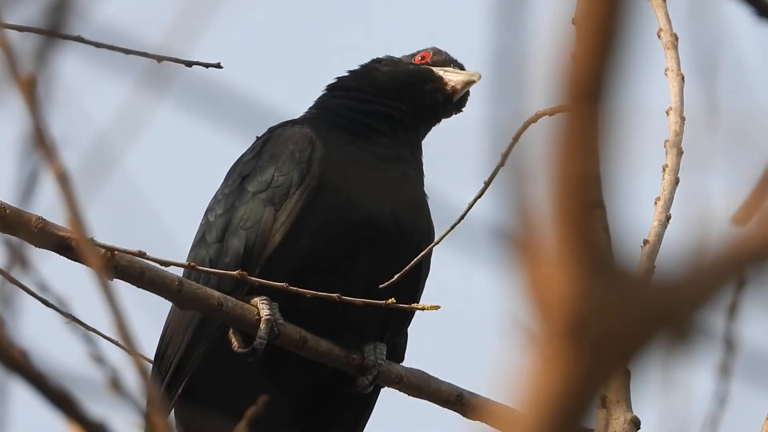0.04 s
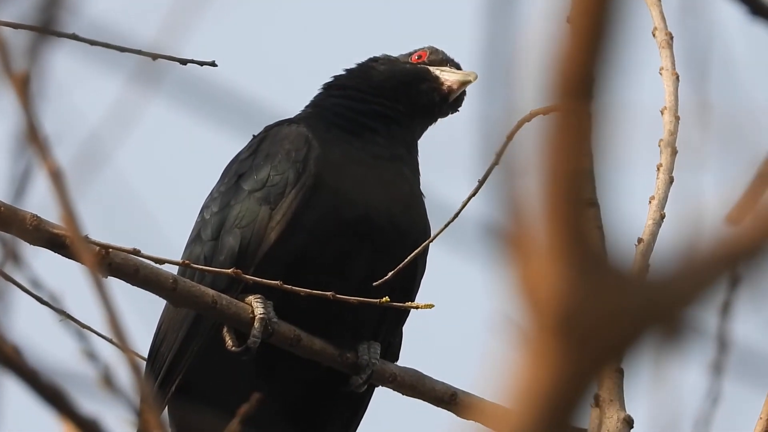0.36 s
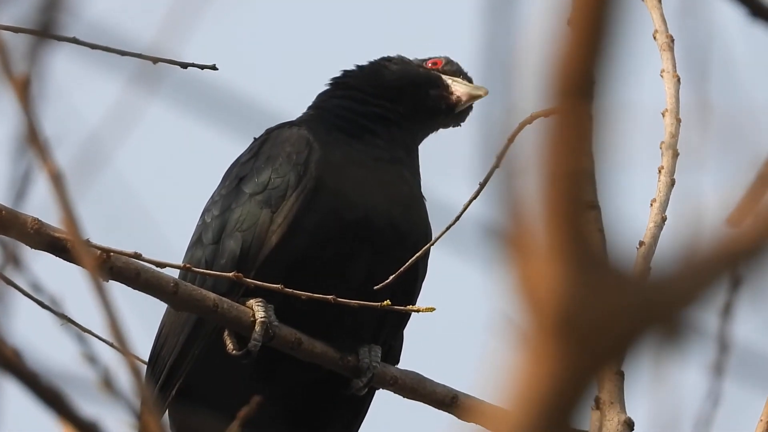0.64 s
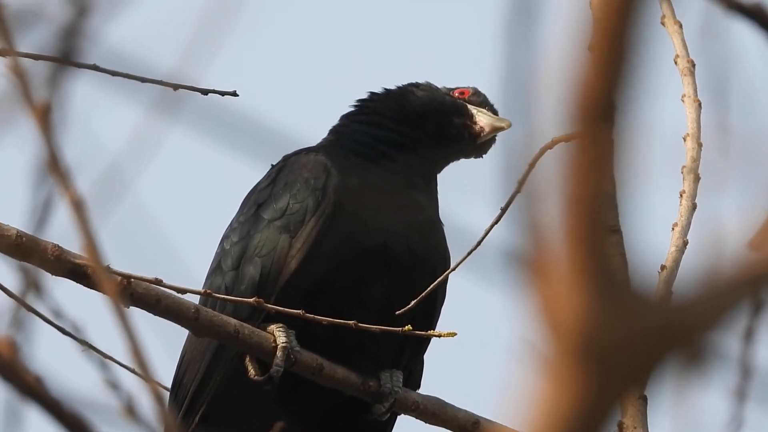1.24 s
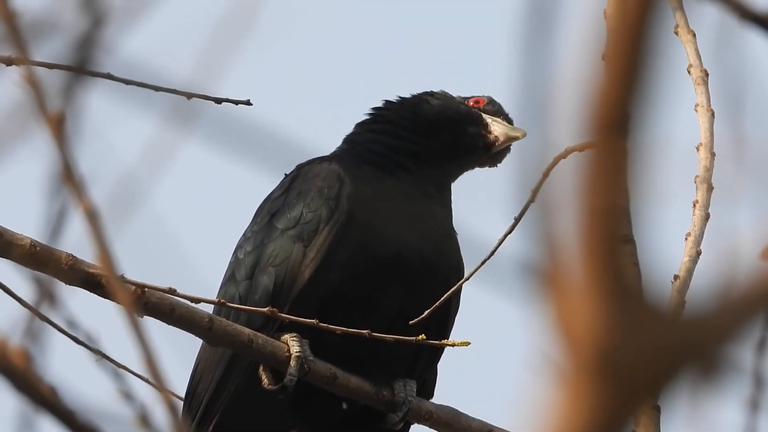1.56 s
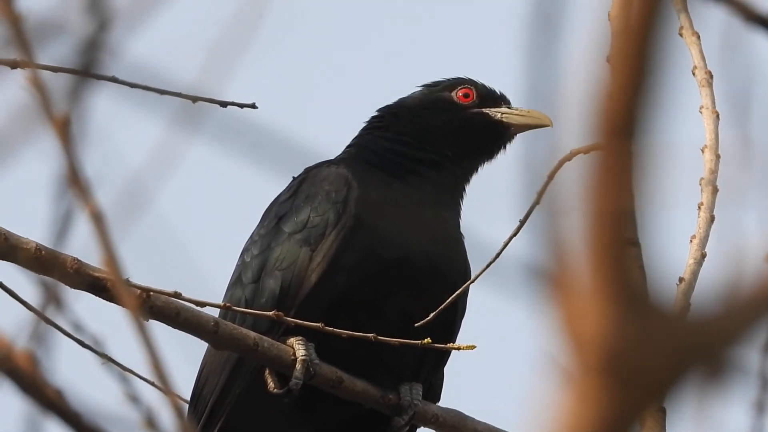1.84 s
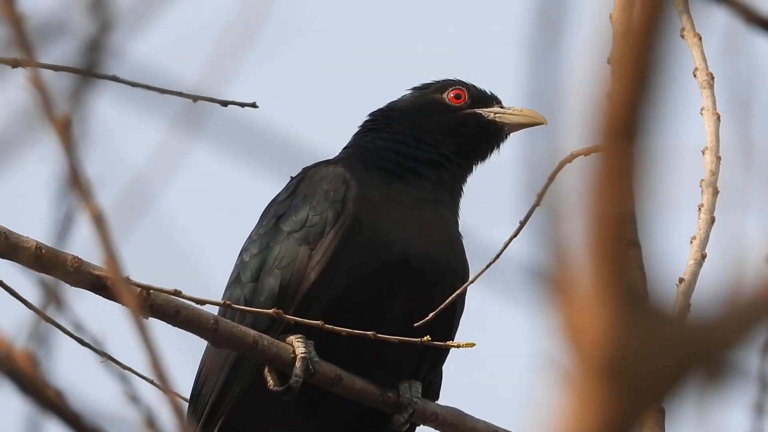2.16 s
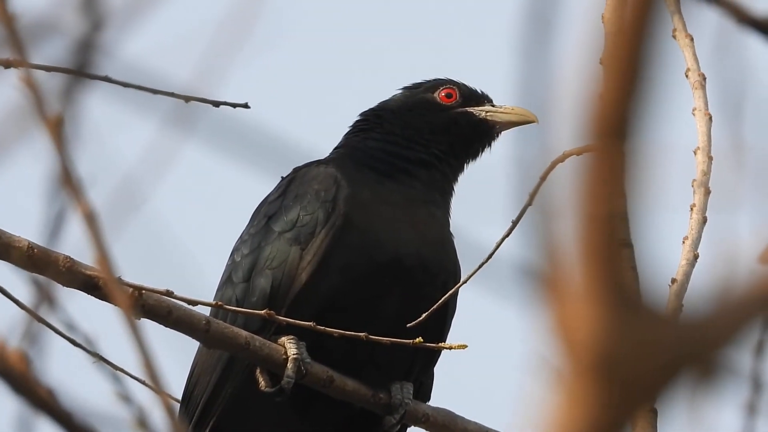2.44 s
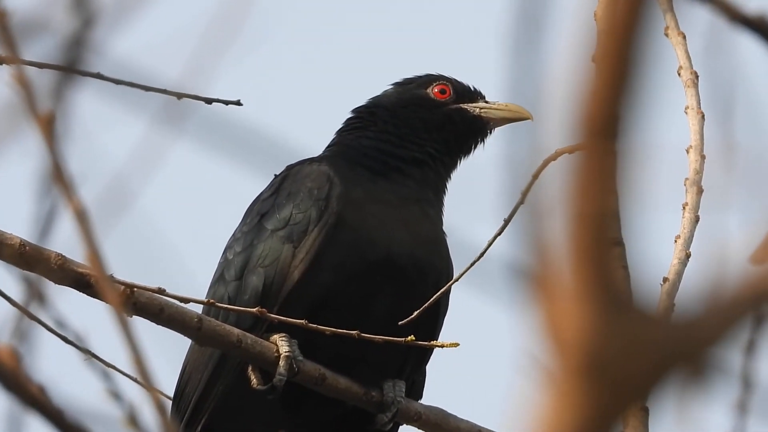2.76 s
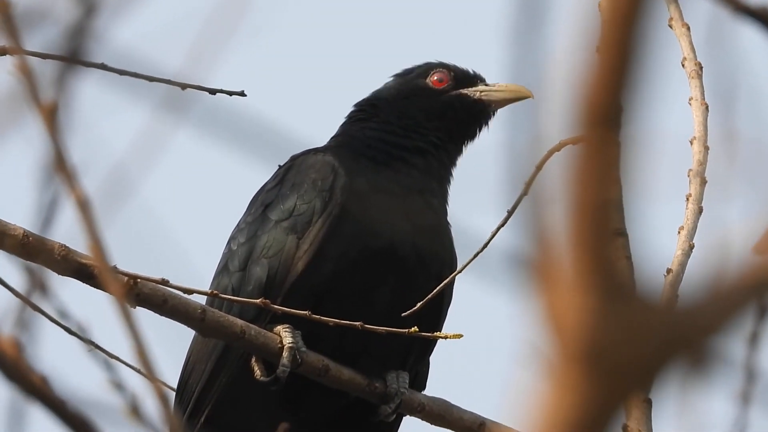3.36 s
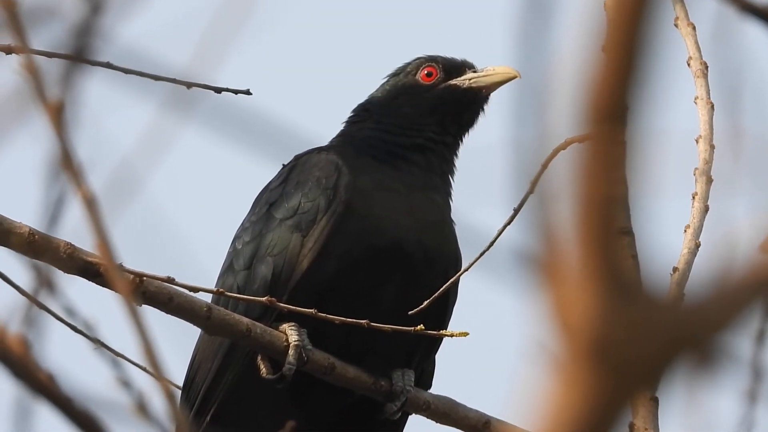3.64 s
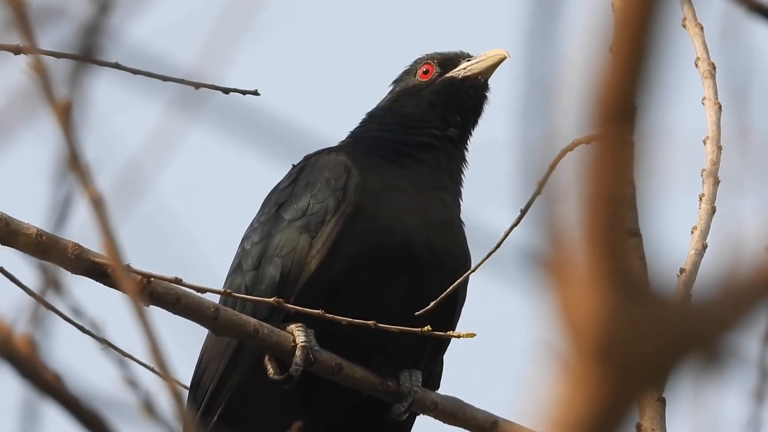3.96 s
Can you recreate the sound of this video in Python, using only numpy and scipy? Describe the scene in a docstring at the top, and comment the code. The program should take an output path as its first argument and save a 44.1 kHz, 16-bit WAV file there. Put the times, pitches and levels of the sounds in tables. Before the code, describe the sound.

A cuckoo-like bird hoots a low four-note phrase about every 0.65 seconds for the whole four seconds, with thin whistles and buzzy chirps in the surrounding trees. Around 1 second come three rising whistles and the start of hoarse, falling chatter. A few close, dry ticks follow from 1.4 seconds, and three grating squawks sound between 2.7 and 3.6 seconds. A distant wash and soft hiss lie underneath.

```python
"""Four seconds among trees, on a stereo microphone, over a distant wash and a soft hiss.
From the start a cuckoo-like bird hoots four near-pure notes every 0.65 s, with thin whistles
and buzzy chirps and hissy chips in the branches. Around 1 s come three rising whistles and the first
hoarse, falling chatter, then a few close ticks; from 2.7 s, three squawks of irregular throat pulses.
Trunks and branches scatter every call into a short tail."""
import sys
import numpy as np
from scipy import signal
from scipy.fft import rfft, irfft
from scipy.io import wavfile
from scipy.ndimage import uniform_filter1d

SR = 44100
rng = np.random.default_rng(int(sys.argv[2]) if len(sys.argv) > 2 else 0)


def log_audio(samples):
    """Write samples as a 16-bit WAV file to the path given in sys.argv[1]."""
    # one column per channel
    frames = np.atleast_2d(samples).T
    # limit to full scale, then quantise
    limited = np.clip(frames, -1, 1)
    pcm = np.round(limited * 32767).astype(np.int16)
    wavfile.write(sys.argv[1], SR, pcm)


N = 4 * SR


def amp(db):
    return 10 ** (np.asarray(db) / 20)


def unit(x):
    """Scales to rms 1."""
    return x / np.sqrt(np.mean(x ** 2) + 1e-20)


def phase(hz):
    return 2 * np.pi * np.cumsum(hz) / SR


def read(points, hz):
    """Reads a table on a log-frequency axis."""
    f, value = np.transpose(points)
    return np.interp(np.log(hz + 1), np.log(f + 1), value)


def add(mix, start_s, sound):
    """Mixes a sound in, dropping what falls outside the mix."""
    at = round(start_s * SR)
    sound = sound[max(-at, 0):]
    part = mix[max(at, 0):][:len(sound)]
    part += sound[:len(part)]


def note(length, edge_s):
    """Progress u, 0-1, through a note, and its envelope with soft ends."""
    u = np.linspace(0, 1, int(length * SR))
    to_end_s = np.minimum(u, 1 - u) * length
    return u, np.sin(np.pi / 2 * np.minimum(to_end_s / min(edge_s, length / 2), 1))


def coloured(x, gain):
    """Filters by a gain that is a function of frequency; rms 1."""
    return unit(irfft(rfft(x) * gain(np.fft.rfftfreq(len(x), 1 / SR)), len(x)))


def waver(u, rate_hz):
    """Smooth random motion as long as u, rms about 1."""
    noise = rng.standard_normal(len(u) + 4096)
    return coloured(noise, lambda f: np.exp(-.5 * (f / rate_hz) ** 2))[:len(u)]


def rasp(hz, breath, harmonics):
    """Throat pulses mixed with a puff of noise in each cycle."""
    cycle = phase(hz)
    pulses = unit(sum(np.cos(k * cycle) for k in range(1, harmonics + 1)))
    puffs = unit((1 + np.cos(cycle)) * rng.standard_normal(len(cycle)))
    return (1 - breath) * pulses + breath * puffs


def burst(length, edge_s, centre_hz, width_hz, top_hz=10340):
    """A short puff of noise in one broad resonance."""
    def resonance(f):
        peak = 1 / np.hypot(1, 2 * (f - centre_hz) / width_hz)
        return peak * f / (f + centre_hz) / (1 + (f / top_hz) ** 16)
    u, env = note(length, edge_s)
    return env * coloured(rng.standard_normal(len(u)), resonance)


BIRDS_LAG_S = .00005  # the smaller birds reach the right channel this much later
# Time the trees take to die away by 60 dB: f/Hz, decay/s
TREE_DECAY = [(200, 0.43), (800, 0.66), (3000, 1), (6000, 0.61), (10000, 0.6)]


def trees(x, wet_db, lag_s=0, width=1):
    """Direct sound at the microphone plus sparse scattering from trunks and branches."""
    echoes_per_s, first_echo_s = 2500, .0022
    taps = rng.standard_normal((2, SR)) * (rng.random((2, SR)) < echoes_per_s / SR)
    taps *= np.arange(SR) > first_echo_s * SR
    hz, t, spectrum = signal.stft(taps, SR, nperseg=256)
    decay = amp(-60 * t / read(TREE_DECAY, hz)[:, None])
    tail = signal.istft(spectrum * decay, SR, nperseg=256)[1]
    tail = tail.mean(0) + width * (tail - tail.mean(0))
    wet = signal.fftconvolve(x[None], tail / np.linalg.norm(tail[0]), axes=1)[:, :N]
    direct = np.array([x, np.roll(x, round(lag_s * SR))])
    return (direct + amp(wet_db) * wet) / np.hypot(1, amp(wet_db))


# Spectrum of the open air: f/Hz, relative level/dB
AIR_SPECTRUM = [(15, -59), (25, -47), (59, -31), (120, -19.5), (175, -3.5), (245, -8.5), (310, -1.5),
                (603, -9.5), (777, -4), (927, -10), (1110, -9), (1260, -12.5), (2420, -13.5), (2750, -10),
                (3040, -14), (4790, -10), (7550, -22), (8780, -20), (10500, -35), (13600, -52),
                (22000, -120)]
# Likeness of the air in the two channels: f/Hz, correlation
AIR_CORRELATION = [(40, 0.74), (300, 0.98), (1000, 0.82), (2500, 0.81), (6000, 0.074)]


def air(level_db=-42.2, patch_db=2.3):
    """All around the microphone: a low distant wash and a soft hiss, drifting in patches."""
    hz = np.fft.rfftfreq(2048, 1 / SR)
    a, b, c, d, patches = rng.standard_normal((5, N // 512 + 5, len(hz))).transpose(0, 2, 1)
    patches = uniform_filter1d(patches, size=8, axis=0)  # smooth over frequency
    patches = unit(uniform_filter1d(patches, size=10, axis=1))  # and over time
    likeness = read(AIR_CORRELATION, hz)[:, None]
    left = a + 1j * b
    right = likeness * left + np.sqrt(1 - likeness ** 2) * (c + 1j * d)
    spectrum = np.array([left, right]) * amp(read(AIR_SPECTRUM, hz)[:, None] + patch_db * patches)
    return amp(level_db) * unit(signal.istft(spectrum, nperseg=2048, noverlap=1536)[1][:, :N])


# Thin gliding tones: t/s, length/s, start f/Hz, middle f/Hz, end f/Hz, level/dB
THIN_WHISTLES = [(0, .24, 1480, 1545, 1530, -45.5), (0, .17, 2820, 2835, 2780, -48),
                 (.01, .08, 4150, 4200, 4150, -52), (.16, .18, 2720, 2610, 2540, -52),
                 (.25, .18, 1550, 1550, 1545, -57), (.28, .1, 3200, 2980, 2880, -53),
                 (1.015, .11, 4280, 4200, 4200, -39), (1.25, .09, 4250, 4180, 4150, -42),
                 (1.465, .06, 4300, 4050, 3950, -39), (1.87, .05, 4500, 4400, 4150, -40),
                 (1.93, .1, 4200, 3150, 2550, -44), (2.14, .07, 6200, 5600, 4950, -46),
                 (2.195, .035, 3800, 3200, 2700, -42), (2.55, .25, 4250, 3950, 3900, -50),
                 (3.68, .13, 3900, 3700, 3680, -47)]


def thin_whistles(waver_hz=20):
    """Clean tones: far whistles, ringing after the rising whistles, falling glides in the chatter."""
    out = np.zeros(N)
    for start, length, from_hz, mid_hz, to_hz, db in THIN_WHISTLES:
        u, env = note(length, .014)
        arc = np.polyfit([0, .5, 1], [from_hz, mid_hz, to_hz], 2)
        hz = np.polyval(arc, u) + waver_hz * waver(u, 100)
        add(out, start, amp(db) * unit(env * np.sin(phase(hz))))
    return trees(out, wet_db=-2)


# Contact calls: t/s, length/s, centre f/Hz, level/dB
CHIP_CALLS = [(0.239, 0.037, 8560, -37.5), (1.483, 0.01, 8700, -27), (1.693, 0.034, 8200, -35.5),
              (2.219, 0.033, 8650, -37), (2.708, 0.021, 7600, -35), (3.103, 0.038, 8450, -36),
              (3.599, 0.042, 8260, -33), (3.657, 0.053, 7630, -33.5)]


def chips():
    """In the branches: high, hissy puffs of noise."""
    out = np.zeros(N)
    for start, length, centre_hz, db in CHIP_CALLS:
        add(out, start, amp(db) * burst(length, edge_s=.0024, centre_hz=centre_hz, width_hz=660))
    return trees(out, wet_db=.5, lag_s=BIRDS_LAG_S)


# Ticking calls: t/s, centre f/Hz, level/dB
TICK_CALLS = [(1.418, 4600, -24), (1.492, 4210, -33.5), (2.907, 4560, -27.5), (3.079, 4370, -30),
              (3.566, 5000, -27)]


def ticks():
    """Closer to the microphone: dry, very short puffs of noise."""
    out = np.zeros(N)
    for start, centre_hz, db in TICK_CALLS:
        add(out, start, amp(db) * burst(length=.009, edge_s=.002, centre_hz=centre_hz, width_hz=1000))
    return trees(out, wet_db=-3, lag_s=BIRDS_LAG_S)


# Small birds: t/s, length/s, start f/Hz, end f/Hz, flutter depth/Hz, level/dB
CHIRP_CALLS = [(0.229, 0.043, 4880, 4700, 487, -34.5), (0.411, 0.087, 5860, 5850, 703, -33),
               (0.545, 0.067, 5920, 5820, 590, -29), (0.664, 0.043, 5470, 5050, 352, -31.5),
               (0.708, 0.023, 3730, 3950, 150, -40), (0.872, 0.023, 3320, 2490, 150, -41.5),
               (1.697, 0.027, 4420, 5080, 900, -34.5), (2.212, 0.05, 4370, 5130, 503, -38),
               (2.603, 0.0392, 7920, 8200, 400, -37), (2.962, 0.029, 3844, 3820, 139, -27),
               (3.595, 0.064, 4710, 3860, 376, -35.5), (3.954, 0.025, 3220, 2954, 200, -26.5)]


def chirps():
    """In the trees around: quick sweeps, made buzzy by a fast flutter of pitch."""
    out = np.zeros(N)
    for start, length, from_hz, to_hz, flutter_hz, db in CHIRP_CALLS:
        u, env = note(length, .0024)
        hz = from_hz + (to_hz - from_hz) * u + flutter_hz * np.tanh(waver(u, 510))
        add(out, start, amp(db) * unit(env * np.sin(phase(hz))))
    return trees(out, wet_db=2.5, lag_s=BIRDS_LAG_S)


# Chattering bird: t/s, length/s, pitch f/Hz, throat resonance f/Hz, level/dB
CHATTER_NOTES = [(0.999, .12, 1080, 2980, -42), (1.211, 0.13, 1104, 3550, -37.5),
                 (1.447, 0.052, 1120, 3940, -32.5), (1.623, 0.13, 1125, 3850, -33),
                 (1.855, 0.11, 1139, 4210, -33.5), (2.072, 0.12, 1123, 4170, -34),
                 (2.324, .105, 1116, 4040, -31.5), (2.958, 0.076, 997.4, 4230, -26.5),
                 (3.908, 0.13, 1124, 3550, -34.5)]


def chatter(width_hz=690, top_hz=8850, flutter_db=3.5):
    """Hoarse, falling notes through one throat resonance, heard half direct, half off the trees."""
    fall, jitter, wander = .27, .034, .05  # shares of the pitch
    out = np.zeros(N)
    for start, length, pitch_hz, throat_hz, db in CHATTER_NOTES:
        def throat(f):
            return 1 / (1 + ((f - throat_hz) / width_hz) ** 2) ** .6 / (1 + (f / top_hz) ** 6)
        u, env = note(length, .014)
        hz = pitch_hz * (1 - fall * u ** 2 + jitter * waver(u, 377) + wander * waver(u, 39.4))
        voice = coloured(rasp(hz, breath=.3, harmonics=8), throat)
        add(out, start, amp(db + flutter_db * waver(u, 70)) * env * voice)
    return trees(out, wet_db=0, lag_s=BIRDS_LAG_S)


# Squawking bird: t/s, length/s, level/dB, tilt/(dB per octave)
SQUAWK_CALLS = [(2.675, .17, -32.5, -0.2), (2.89, .13, -33.5, 2.5), (3.335, .25, -28, .5)]
# Colour of its voice: f/Hz, relative level/dB
SQUAWK_SPECTRUM = [(300, -65), (750, -12), (1100, -8.5), (2000, -5), (3200, -7.5), (4500, -5),
                   (6300, -12.5), (8500, -11), (10000, -13), (15000, -10)]


def squawks(pitch_hz=322.3, jitter=.2, flutter_db=2.5, top_hz=8400):
    """Grating, irregular pulses with an uneven, ringing colour, heard mostly off the trees."""
    out = np.zeros(N)
    grid_hz = np.arange(0, SR / 2, 110)
    for start, length, db, tilt_db in SQUAWK_CALLS:
        u, env = note(length, .088)
        ripple_db = 3 * rng.standard_normal(len(grid_hz))

        def colour(f):
            gain_db = read(SQUAWK_SPECTRUM, f) + tilt_db * np.log2(f + 1)
            return amp(gain_db + np.interp(f, grid_hz, ripple_db)) / (1 + (f / top_hz) ** 8)
        hz = pitch_hz * (1 + jitter * waver(u, 122.7))
        voice = rasp(hz, breath=.72, harmonics=35) * amp(flutter_db * waver(u, 25))
        add(out, start, amp(db) * env * coloured(voice, colour))
    return trees(out, wet_db=4, width=.69)


# Rising whistles: t/s, length/s, start f/Hz, knee f/Hz, top f/Hz, relative level/dB, lower voice/dB
RISING_CALLS = [(0.704, .116, 4400, 5400, 5820, -24.5, -32), (0.944, .098, 4300, 5450, 6700, -23, -7.5),
                (1.169, .098, 4350, 5450, 6630, -23, -9)]
# Their climb, in shares: of the note, of the way from start to knee, of the way from knee to top
CLIMB_SHAPE = [(0, 0, 0), (.2, .55, 0), (.37, .79, 0), (.55, 1, 0), (.72, 1, .55), (.88, 1, 1), (1, 1, .85)]
# Paths to the microphone, the strongest off a trunk: delay/s, left level/dB, right level/dB
TRUNK_PATHS = [(0, -5, -11), (.015, -14, -7), (.026, 0, 0), (.053, -5, -6)]


def rising_whistles(swell_db=4.5, flutter_db=2.5, rise_s=.012, scatter_s=.0004):
    """Between the trunks: a whistle climbs slowly, then steeply, over a falling lower voice."""
    upper_rasp_hz, lower_rasp_hz = 115, 90
    lower_from_hz, lower_fall_hz = 3564, 3520
    loudest_at, lower_ends_at = .48, .52  # shares of the note
    out = np.zeros((2, N))
    shares, to_knee, to_top = np.transpose(CLIMB_SHAPE)
    for start, length, from_hz, knee_hz, top_hz, db, lower_db in RISING_CALLS:
        u, env = note(length, .006)
        hz = from_hz + (knee_hz - from_hz) * np.interp(u, shares, to_knee)
        hz += (top_hz - knee_hz) * np.interp(u, shares, to_top)
        cycle = phase(hz + upper_rasp_hz * np.sqrt(2 * (1 - u ** 2)) * waver(u, 510))
        upper = np.sin(cycle) + amp(-48) * np.sin(2 * cycle)
        upper *= amp(-swell_db * abs(u - loudest_at) / loudest_at)
        cycle = phase(lower_from_hz - lower_fall_hz * u ** 2 + lower_rasp_hz * waver(u, 650))
        lower = np.sin(cycle) + amp(-9) * np.sin(2 * cycle)
        lower *= amp(lower_db) * np.sin(np.pi * np.minimum(u / lower_ends_at, 1) ** .5)
        env *= np.minimum(u * length / rise_s, 1)
        call = 2 * amp(db + flutter_db * waver(u, 70)) * env * (upper + lower)
        for delay, *sides_db in TRUNK_PATHS:
            for channel, side_db in zip(out, sides_db):
                add(channel, start + delay + scatter_s * rng.standard_normal(), amp(side_db) * call)
    return np.array([trees(channel, wet_db=-1.5)[side] for side, channel in enumerate(out)])


# Hooting bird: t/s, pitch offset/Hz, middle notes early by/s, level/dB of notes 1-4, held-note swell/dB
HOOT_PHRASES = [(-.255, 4.5, 0, -30, -26, -30, -15, -3), (.36, -3, 0, -24.5, -22.5, -22, -20, -2.5),
                (1.01, 1.5, 0.0075, -29, -22.5, -26, -31.5, 6),
                (1.66, 0, 0.0097, -25, -26, -26.5, -28.5, 14),
                (2.31, 2.5, 0.00062, -22.5, -30.5, -25, -21, -3),
                (2.96, 0, 0.0029, -25.5, -26.5, -26, -23, -1), (3.61, 2, 0.0063, -29, -22, -26.5, -23.5, 6)]
# The four notes of a phrase: delay/s, length/s, start f/Hz, end f/Hz, fade/dB
HOOT_NOTES = [(0, .06, 802, 690, -11), (.102, .038, 796, 780, 0), (.152, .043, 804, 772, 0),
              (.201, .087, 777, 790, 0)]
# Echoes that make the tail pulse: delay/s, level/dB
HOOT_REFLECTIONS = [(.054, -13.5), (.078, -19), (.155, -26.5)]


def hoots(attack_s=.016, release_s=.018, waver_hz=2, tremor_db=.8, dip_db=2.5, direct_s=.0018):
    """The main bird, mostly direct: a falling note, two short ones and a held one that swells twice."""
    out = np.zeros(N)
    for start, offset_hz, early_s, *levels, swell_db in HOOT_PHRASES:
        for k, ((delay, length, from_hz, to_hz, fade_db), db) in enumerate(zip(HOOT_NOTES, levels)):
            u, attack = note(length, attack_s)
            _, release = note(length, release_s)
            env = np.where(u < .5, attack, release) ** 2
            hz = offset_hz + from_hz + (to_hz - from_hz) * u + waver_hz * waver(u, 43)
            level_db = db + fade_db * u + tremor_db * waver(u, 25)
            if k == 3:  # the held note dips halfway
                level_db += swell_db * (u - .5) - dip_db * np.sin(np.pi * u) ** 8
            onset = start + delay - early_s * (k in (1, 2))
            hoot = env * amp(level_db) * np.sin(phase(hz))
            for path_s, path_db in [(direct_s, 0)] + HOOT_REFLECTIONS:
                add(out, onset + path_s, amp(path_db) * hoot)
    return trees(out, wet_db=-12, width=.37) * amp([[-1], [0]])  # just right of centre


def scene():
    """All that reaches the microphone, from the background to the hooting bird."""
    small_birds = thin_whistles() + chips() + ticks() + chirps()
    return air() + small_birds + chatter() + squawks() + rising_whistles() + hoots()


def record(dry, left_db=-.55, top_hz=14000):
    """The microphone: a slightly weaker left channel, then the band limit."""
    lowpass = signal.firwin(255, top_hz, window=("kaiser", 8), fs=SR)
    return signal.oaconvolve(dry * amp([[left_db], [0]]), lowpass[None], "same")


dry = scene()
out = record(dry)
log_audio(out)
```